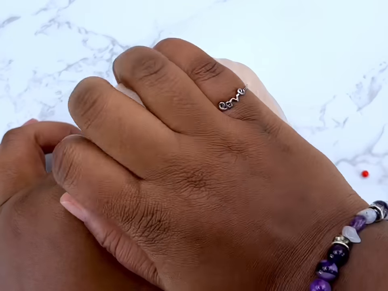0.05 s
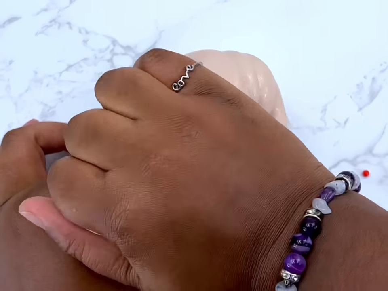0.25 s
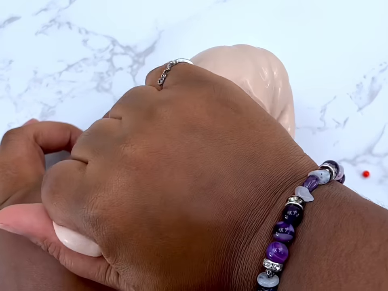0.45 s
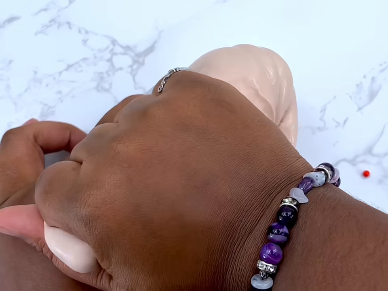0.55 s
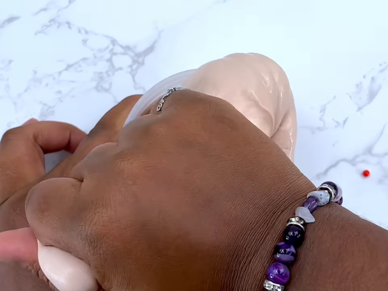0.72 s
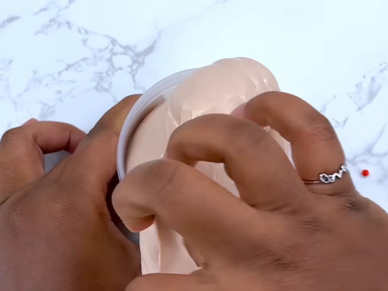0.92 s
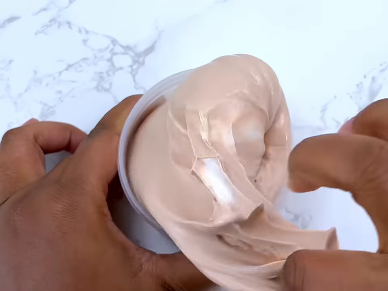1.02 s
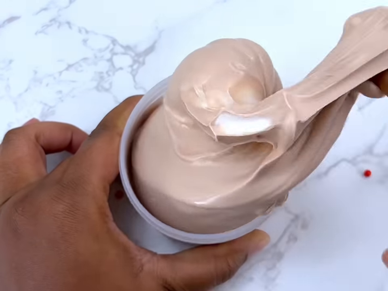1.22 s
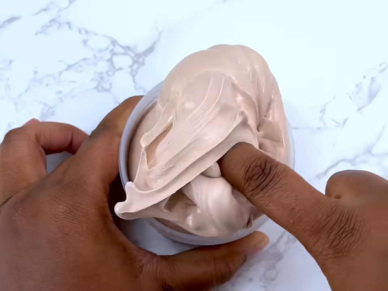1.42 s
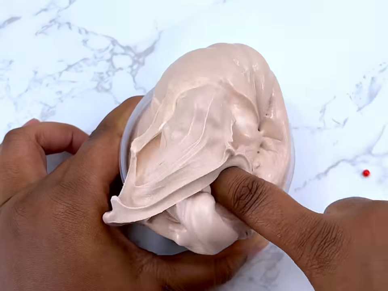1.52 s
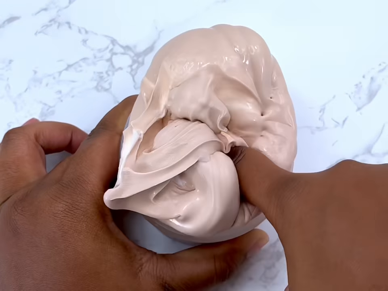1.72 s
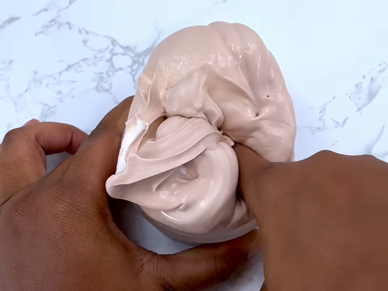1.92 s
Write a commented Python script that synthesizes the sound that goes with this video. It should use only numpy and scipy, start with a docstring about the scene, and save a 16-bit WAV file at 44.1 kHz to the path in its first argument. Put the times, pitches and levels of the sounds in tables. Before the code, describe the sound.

Sticky slime popping loudly and squelching as hands press it into a plastic tub.

```python
"""Sticky slime pops as hands press it into a plastic tub on a table, close to a stereo microphone.
Trapped air bursts out in three loud pops of noise and a few bubbles that ring as short gliding tones.
The hand lifts with a squelch, a shower of tiny ruptures. Then come only faint smacks of tearing film,
low gulps and soft bumps of the tub as a finger pulls and pokes.
A small room answers, over handling rumble and steady hiss."""
import sys
import numpy as np
from scipy import signal
from scipy.fft import rfft, irfft
from scipy.io import wavfile
from scipy.ndimage import uniform_filter1d

SR = 44100
rng = np.random.default_rng(int(sys.argv[2]) if len(sys.argv) > 2 else 0)


def to_wav(s):
    """Save 16-bit WAV."""
    ch = np.atleast_2d(s).T  # columns
    pcm = np.round(np.clip(ch, -1, 1) * 32767)  # PCM
    wavfile.write(sys.argv[1], SR, pcm.astype(np.int16))


N = 85995
T = np.arange(N) / SR

# colours of the three pops, broad crack, bright snap and softer splutter: f/Hz, level/dB
CRACK = [(40, -19.5), (100, -16), (220, -6.5), (370, -1.5), (570, -7.5), (820, -1), (1200, -8), (1500, -4),
         (2400, -4.5), (5500, -9), (7200, -3), (9500, -10), (12300, -12), (15500, -18)]
SNAP = [(35, -39), (60, -27.5), (351, -23), (533, -27.5), (613, -34.5), (998, -33), (1630, -17.5),
        (1780, -22), (2650, -2.5), (3120, -9), (5700, -4), (7190, -33), (8080, -29.5), (10200, -21),
        (15500, -43)]
SPLUT = [(120, -69), (200, -50), (575, -35), (728, -23), (1260, -17.5), (1540, -9), (2380, -14),
         (3070, -12.5), (5200, -17), (7610, -32.5), (12700, -36), (15500, -36.5)]
# how alike the two microphone ports hear a sound: f/Hz, left-right correlation
PORT_LIKENESS = [(40, 0.85), (130, 1), (280, -0.066), (700, 0.46), (2000, -0.17), (8000, -0.37),
                 (15000, .2)]


def pops(size=8192):
    """Large air pockets burst through the slime."""
    # air pockets: t/s, level/dB, rise/s, hold/s, decay/s, pan/dB, colour
    pockets = [(0.2106, -4, .0007, 0.0043, .0045, 3, CRACK), (.3471, -5, .0003, .0035, .0038, 3, SNAP),
               (0.4699, -19, 0.0023, 0.025, .006, 2.5, SPLUT)]
    out, t = np.zeros((2, N)), T[:size]
    for start, db, rise, hold, decay, pan_db, spectrum in pockets:
        envelope = np.minimum(t / rise, 1) * np.exp(-np.maximum(t - rise - hold, 0) / decay)
        add(out, start, amp(db) * burst(envelope, spectrum, clump_db=-0.5), pan_db)
    return out


def bubbles():
    """Cavities in the slime ring briefly as they open."""
    # cavities: t/s, level/dB, f/Hz, length/s, glide/octaves, pan/dB
    cavities = [(.2075, -28, 68, .016, -.4, 5), (.2105, -14, 810, .0066, -.5, -6),
                (.2115, -11, 300, .011, -1.2, -1), (.212, -17, 1450, .016, -.1, -3),
                (.211, -17, 7200, .016, 0, 12), (.3473, -3, 2760, .0055, -.15, -6),
                (0.4867, -5, 1505, 0.0069, -0.15, 3), (0.5295, -18, 1493, .007, -0.25, 4.5),
                (.6110, -22.5, 1545, 0.014, 0.27, 4), (0.6257, -20.5, 1700, .004, 0.5, -3),
                (0.637, -34, 1020, 0.0088, -0.49, 7), (.8070, -30.5, 1000, 0.0056, 0.4, 0.5),
                (.8090, -31, 350, 0.0071, -0.44, 0), (0.85, -30, 406, 0.012, -0.83, 0),
                (.8840, -31, 1618, 0.028, 0.091, -1), (0.913, -29, 1800, .006, 0.23, -4),
                (1.145, -51, 4680, .012, 0, 3)]
    out = np.zeros((2, N))
    for start, db, hz, length, glide, pan_db in cavities:
        add(out, start, amp(db) * ring(hz, length, glide), pan_db)
    return out


def tears():
    """Thin sticky films tear and let out spits of air."""
    # films: t/s, level/dB, centre f/Hz, width/octaves, length/s, pan/dB
    films = [(0.174, -44.5, 570, 0.92, 0.0083, -2), (0.199, -32, 6500, 0.11, 0.048, 22.5),
             (0.329, -31.5, 4800, 0.34, 0.037, 6), (.3440, -25, 5300, .13, .004, 9),
             (.3468, -17, 12000, .5, .002, 0), (.4715, -20.5, 4960, 0.043, 0.0043, 11),
             (0.4727, -25, 2420, 0.35, 0.0048, 12), (0.531, -24.5, 1560, 1.2, 0.0056, 1),
             (0.5783, -28.5, 4580, 0.39, 0.011, 7.5), (0.6136, -28, 1590, 0.94, 0.016, 2.5),
             (0.622, -16.5, 13000, 0.37, 0.0061, 0), (0.634, -29, 5500, 2.6, 0.018, 5.5),
             (0.776, -37.5, 8200, 2.1, 0.046, 12), (0.827, -39.5, 7200, 0.18, 0.01, 13.5),
             (0.887, -28.5, 3720, 0.27, 0.0037, 7), (0.994, -49.5, 8880, 1.1, 0.0033, 12),
             (1.1426, -41.5, 12800, .15, .0105, -2), (1.1435, -47.5, 4800, 0.59, .007, 5.5),
             (1.151, -44.5, 8100, 0.32, 0.026, 3.5), (1.177, -44, 12990, .12, .005, 0),
             (1.178, -46.5, 3920, 0.82, 0.0058, 3.5), (1.179, -44, 8700, 0.21, 0.014, 4),
             (1.407, -63.5, 2558, 0.23, 0.055, 2), (1.409, -58, 8980, 0.46, 0.065, 3),
             (1.487, -43.5, 2150, 0.4, 0.013, -0.5), (1.515, -47, 1860, 0.77, 0.018, 1),
             (1.898, -51.5, 3490, 0.88, 0.0098, 4)]
    out = np.zeros((2, N))
    for start, db, hz, octaves, length, pan_db in films:
        add(out, start, amp(db) * burst(swell(length), hump(hz, octaves)), pan_db)
    return out


def squeak(start=0.3612, db=-29.5, hz=12500, length=0.0145, jitter=0.014):
    """Air whistles unsteadily through a closing pinhole just after the second pop."""
    out = np.zeros((2, N))
    envelope = swell(length)
    waver, flutter = unit(uniform_filter1d(rng.standard_normal((2, len(envelope))), size=16))
    pitch = sweep(hz, length, glide=-0.15) * (1 + jitter * waver)
    whistle = (1 + 0.5 * flutter) * np.sin(2 * np.pi * np.cumsum(pitch) / SR)
    add(out, start, amp(db) * envelope * whistle, pan_db=1.5)
    return out


def squelch():
    """Slime peels from the palm: low gurgle, middle crackle and fine fizz."""
    # faders ahead of the trims: t/s, gurgle level/dB, crackle level/dB, fizz level/dB
    faders = [(0.729, -71.5, -70, -56), (0.75, -62.5, -54.5, -55), (0.771, -41.5, -45, -39.5),
              (0.788, -34, -41, -32), (0.805, -37.5, -42.5, -44.5), (0.84, -36, -36, -36),
              (0.858, -43, -44, -41), (0.876, -38, -39, -39.5), (0.885, -45, -30.5, -37.5),
              (0.914, -43.5, -35.5, -32.5), (0.942, -59, -49, -45), (0.96, -81, -72, -50),
              (1.03, -87.5, -100, -78)]
    # low, wet body: f/Hz, level/dB
    gurgle_colour = [(94, -41), (160, -13), (198, -2), (395, -7), (434, -8.5), (473, -4), (602, -16),
                     (753, -7.5), (1010, -3), (1250, -17.5), (1620, -51), (2750, -120)]
    # sticky midrange: f/Hz, level/dB
    crackle_colour = [(710, -67), (1200, -34.5), (1350, -3.5), (1600, -8.5), (1960, -4), (2340, -9),
                      (3430, -8.5), (5500, -17.5), (7150, -44), (12100, -120)]
    # airy top: f/Hz, level/dB
    fizz_colour = [(2650, -34), (4500, -0.5), (9380, -4), (10000, -15), (10800, -41), (11200, -10),
                   (12000, -2.5), (14500, -4), (15500, -15)]
    times, gurgle_db, crackle_db, fizz_db = np.transpose(faders)
    gurgle = fader(times, gurgle_db) * grains(gurgle_colour, per_s=360, spread_db=3.8, trim_db=0.14)
    crackle = fader(times, crackle_db) * grains(crackle_colour, per_s=1700, spread_db=2.1, trim_db=-1)
    fizz = fader(times, fizz_db) * grains(fizz_colour, per_s=3000, spread_db=1.5, trim_db=-0.5)
    return gurgle + crackle + fizz


def bumps():
    """The tub bumps under the hands: dull gliding thuds, each with a little rubbing."""
    # thuds: t/s, level/dB, f/Hz, length/s, glide/octaves, pan/dB
    thuds = [(0.184, -31, 249.4, 0.088, 0.25, 0), (0.73, -45.5, 166, 0.01, -0.66, 4),
             (0.929, -38, 125.1, 0.024, 0.048, -4.5), (1.668, -46, 250.5, 0.018, -.3, -1.5),
             (1.902, -41, 115, 0.027, -.3, -1)]
    out = np.zeros((2, N))
    for start, db, hz, length, glide, pan_db in thuds:
        tone = amp(-3) * ring(hz, length, glide)
        rub = amp(-2) * burst(swell(length), hump(hz=188, octaves=0.49))
        add(out, start, amp(db) * (tone + rub), pan_db)
    return out


def gulps():
    """Slime sinks into the tub with a low tone that falls as the pocket gives way."""
    # pushes: t/s, level/dB, starting f/Hz, length/s, fall/octaves, pan/dB
    pushes = [(0.549, -35, 235, .066, 1.2, -5.5), (1.517, -45, 244.4, 0.056, 1.28, -4.5),
              (1.667, -43, 179.6, 0.0834, 1.38, -3.5), (1.903, -42.5, 221.6, 0.058, 0.13, -3)]
    out = np.zeros((2, N))
    for start, db, hz, length, fall, pan_db in pushes:
        age = np.minimum(T[:SR // 4] / length, 1)
        envelope = swell(length, skew=0.48, size=len(age))
        phase = 2 * np.pi * np.cumsum(hz * 2 ** (-fall * age)) / SR
        overtone = amp(-12) * (1 - age) * np.sin(2 * phase)
        tone = envelope * (np.sin(phase) + overtone)
        rub = amp(-9) * burst(envelope, hump(hz, octaves=0.49))
        add(out, start, amp(db) * (tone + rub), pan_db)
    return out


def press():
    """The palm bears down on the slime with a faint sticky rustle before the first pop."""
    # growing pressure, ahead of the trim: t/s, level/dB
    pressure = [(0.0, -64.5), (0.168, -52.5), (0.195, -51)]
    # palm rubbing on slime: f/Hz, level/dB
    rustle_colour = [(180, -38), (300, -1), (620, -9), (1120, -6.5), (2280, -13.5), (6900, -11),
                     (10800, -26), (12700, -10), (15500, -15)]
    rustle = grains(rustle_colour, per_s=13000, spread_db=1.5, trim_db=0.37)
    return fader(*np.transpose(pressure)) * rustle


def rumble():
    """Handling noise travels through the table as a low rumble that swells and ebbs."""
    # weight of the handling: t/s, level/dB
    handling = [(0, -47), (.2, -51.5), (.38, -41.5), (.46, -69), (.72, -57.5), (.79, -42.5), (.87, -46),
                (1.0, -44), (1.14, -63.5), (1.95, -57)]
    # low end carried by the table: f/Hz, level/dB
    table_colour = [(20, -16), (45, 0), (100, -2.5), (200, -15.5), (500, -33), (1500, -74)]
    return unit(colour(stereo_noise(N), table_colour)) * amp(np.interp(T, *np.transpose(handling)))


def hiss(db=-61):
    """Steady room hiss lies under everything."""
    # room tone: f/Hz, level/dB
    hiss_colour = [(40, -13.5), (120, -5), (220, -13), (400, -14), (800, -20.5), (1650, -20.5),
                   (3850, -25), (6000, -26), (6950, -17.5), (8000, -30.5), (10400, -34),
                   (13900, -24.5), (15500, -38.5)]
    return amp(db) * unit(colour(stereo_noise(N), hiss_colour))


def room(send, size=22050, early_decay_s=0.0096):
    """Quick reflections from table and hands, then the small room's tail."""
    # time the tail takes to fall 60 dB: f/Hz, t60/s
    t60 = [(100, 0.75), (400, 0.3032), (1500, 0.3044), (4000, 0.35), (8000, 0.21), (15000, 0.3)]
    # tone of the tail: f/Hz, level/dB
    tail_colour = [(100, -1), (200, -5), (400, 2), (550, -1), (900, 1.5), (1500, 0.5), (4000, -5.5),
                   (8000, -1), (15000, -10.5)]
    t = T[:size]
    hz, frame_times, bands = signal.stft(stereo_noise(size), SR, nperseg=256)
    decay = amp(-60 * frame_times / read(t60, hz)[:, None])
    tail = signal.istft(bands * decay, SR, nperseg=256)[1][:, :size]
    tail = colour(unit(tail * np.minimum(t / 0.0027, 1)), tail_colour)
    early = unit(stereo_noise(size) * np.exp(-t / early_decay_s) * np.minimum(t / 0.0076, 1))
    response = (amp(-6.5) * tail + amp(-8.5) * early) / np.sqrt(size)
    return signal.fftconvolve(send, response, axes=1)[:, :N]


def burst(envelope, spectrum, clump_db=4):
    """A cluster of tiny ruptures: uneven noise under an envelope, with that envelope's energy."""
    n = len(envelope)
    clumps = amp(clump_db * unit(uniform_filter1d(rng.standard_normal(n), size=30)))
    ruptures = colour(pair(rng.standard_normal((2, n)) * envelope * clumps), spectrum)
    return np.array([unit(side) for side in ruptures]) * np.sqrt(np.mean(envelope ** 2))


def ring(hz, length, glide):
    """A short gliding tone that reaches the two ports out of step."""
    phase = 2 * np.pi * np.cumsum(sweep(hz, length, glide)) / SR
    lag = 0.54 * np.arccos(np.clip(read(PORT_LIKENESS, hz), -1, 1))
    return swell(length) * np.sin([phase, phase - lag])


def grains(spectrum, per_s, spread_db, trim_db):
    """A shower of tiny bursts of uneven size that come in clumps."""
    clicks = (rng.random((2, N)) < per_s / SR) * rng.choice([-1, 1], (2, N))
    clumps_db = 2 * unit(uniform_filter1d(rng.standard_normal(N), size=200))
    sizes = amp(clumps_db + spread_db * np.minimum(rng.exponential(1, (2, N)), 4))
    return amp(trim_db) * unit(colour(pair(clicks * sizes), spectrum))


def swell(length, skew=0.73, size=8192):
    """A rounded envelope; a skew under 1 makes it peak early."""
    return np.sin(np.pi * np.clip(T[:size] / length, 0, 1) ** skew)


def sweep(hz, length, glide, size=8192):
    """A pitch curve that moves by glide octaves and passes hz halfway."""
    return hz * 2 ** (glide * (np.minimum(T[:size] / length, 1) - 0.5))


def fader(times, db):
    """A gain curve that is silent outside its span."""
    return amp(np.interp(T, times, db, left=-120, right=-120))


def hump(hz, octaves):
    """A bell-shaped spectrum around a pitch."""
    f = np.geomspace(20, 20000, 300)
    return np.c_[f, -40 * np.log10(1 + (np.log2(f / hz) / (2 * octaves)) ** 2)]


def colour(x, spectrum, size=4096):
    """Minimum-phase EQ: shapes the spectrum with no ringing ahead of an attack."""
    gain = amp(read(spectrum, abs(np.fft.fftfreq(size, 1 / SR))))
    log_gain = np.log(np.maximum(gain, 1e-5))
    response = np.exp(np.conj(signal.hilbert(log_gain)))
    taps = np.fft.ifft(response).real[:size // 2]
    return signal.fftconvolve(x, taps[None], axes=1)[:, :x.shape[1]]


def pair(x):
    """Makes two unrelated signals as alike as the two microphone ports hear them."""
    spectra, n = rfft(x), x.shape[1]
    likeness = read(PORT_LIKENESS, np.fft.rfftfreq(n, 1 / SR))
    angle = np.arccos(np.clip(likeness, -1, 1)) / 2
    mid, side = np.cos(angle) * spectra[0], np.sin(angle) * spectra[1]
    return irfft(np.array([mid + side, mid - side]), n)


def stereo_noise(n):
    """White noise with the microphone's stereo width."""
    return pair(rng.standard_normal((2, n)))


def add(mix, start, sound, pan_db):
    """Mixes a sound in at start seconds; pan is left level minus right."""
    part = mix[:, max(round(start * SR), 0):][:, :sound.shape[-1]]
    part += (sound * amp([[pan_db / 2], [-pan_db / 2]]))[:, :part.shape[1]]


def read(points, hz):
    """Reads a table on a log-frequency axis."""
    f, value = np.transpose(points)
    return np.interp(np.log(hz + 1), np.log(f + 1), value)


def amp(db):
    """Decibels to gain."""
    return 10 ** (np.asarray(db) / 20)


def unit(x):
    """Scales to rms 1."""
    return x / np.sqrt(np.mean(x ** 2) + 1e-20)


def scene():
    """Slime and tub on four buses, each with a send to the room, over rumble and hiss."""
    sharp = pops() + tears()
    ringing = bubbles() + squeak()
    dull = bumps() + gulps()
    sticky = squelch() + press()
    send = sharp + amp(-4.5) * ringing + amp(-1.5) * dull + sticky
    return sharp + ringing + dull + sticky + room(send) + rumble() + hiss()


def record(dry):
    """The microphone notches the sound, peaks clip at full scale, and a low-pass trims the top."""
    # dips in the response of the microphone above the table: f/Hz, width/Hz, level/dB
    dips = [(565.3, 29, -4.5), (168.3, 18, -7), (10740, 550, -14.5)]
    hz = np.fft.rfftfreq(N, 1 / SR)
    response_db = sum(db * np.exp(-((hz - f) / width) ** 2) for f, width, db in dips)
    heard = irfft(rfft(dry) * amp(response_db), N)
    lowpass = signal.firwin(301, cutoff=15750, window=("kaiser", 8), fs=SR)
    return signal.oaconvolve(np.clip(heard, -1, 1), lowpass[None], "same")


dry = scene()
out = record(dry)
to_wav(out)
```